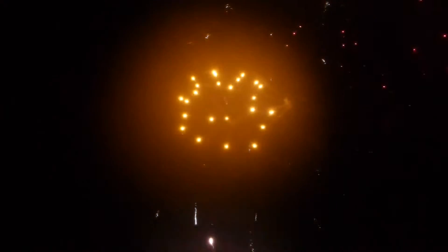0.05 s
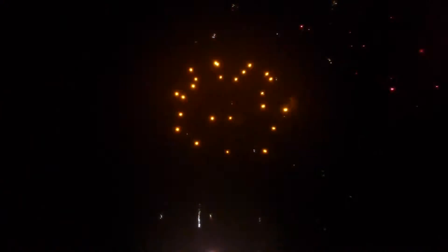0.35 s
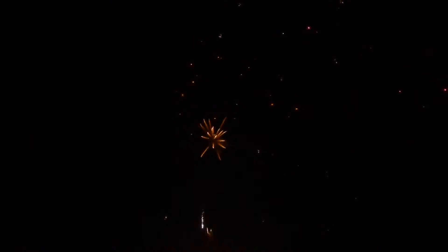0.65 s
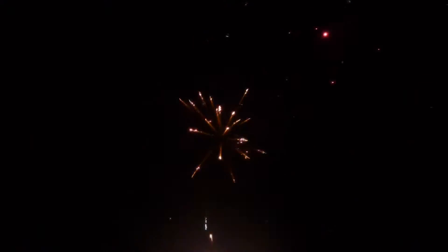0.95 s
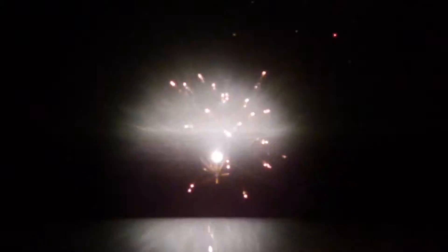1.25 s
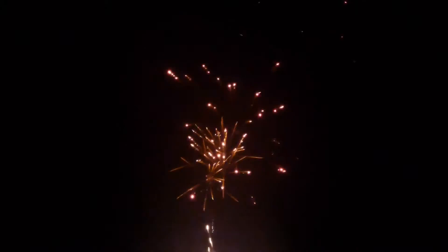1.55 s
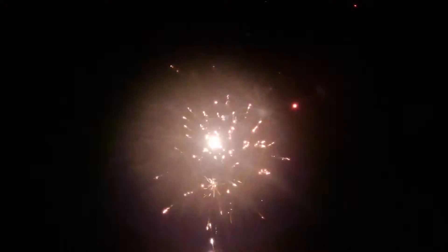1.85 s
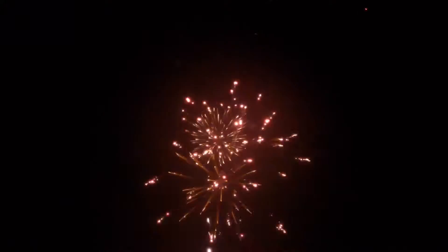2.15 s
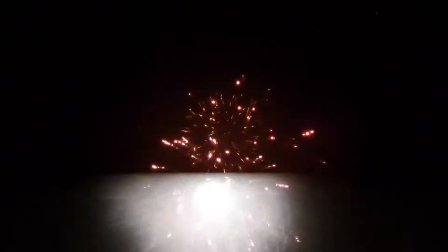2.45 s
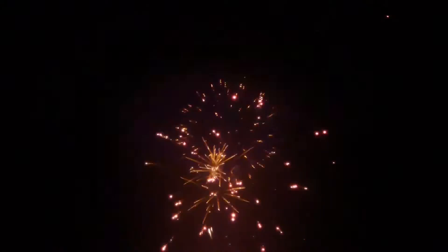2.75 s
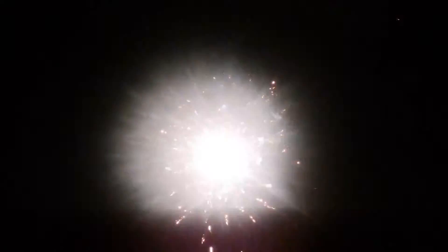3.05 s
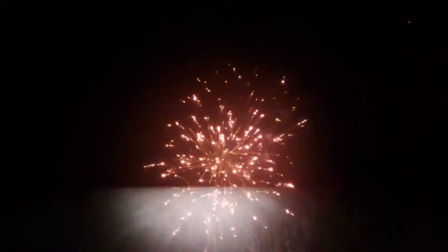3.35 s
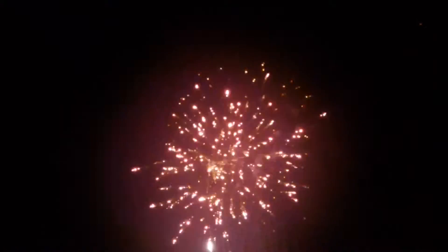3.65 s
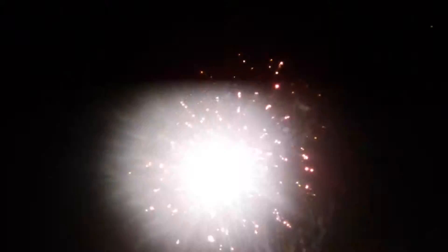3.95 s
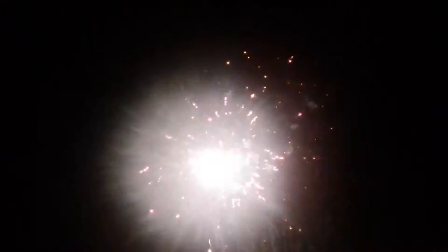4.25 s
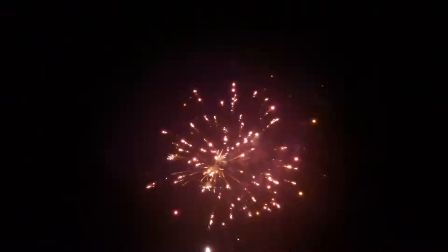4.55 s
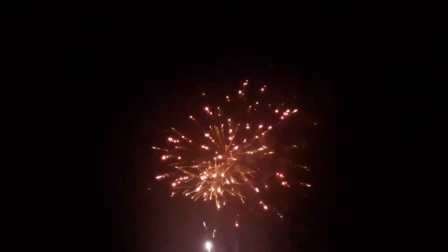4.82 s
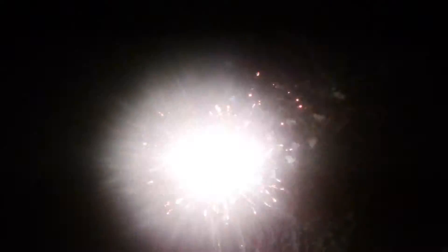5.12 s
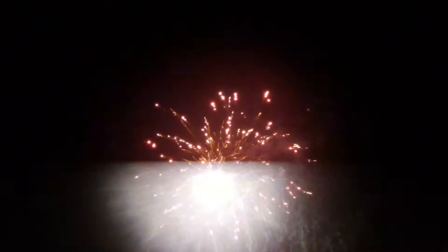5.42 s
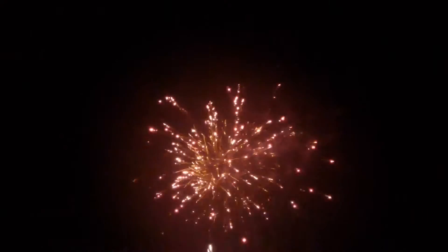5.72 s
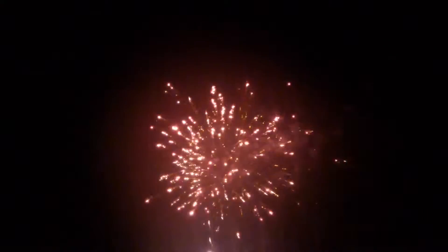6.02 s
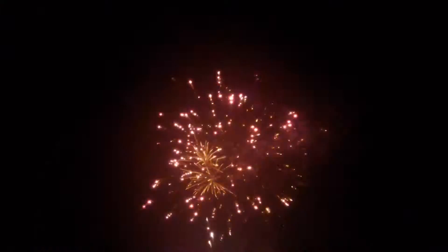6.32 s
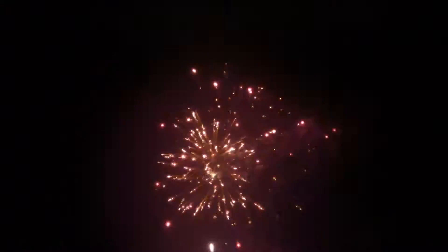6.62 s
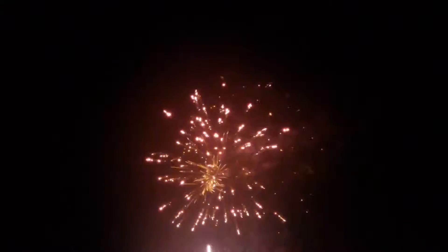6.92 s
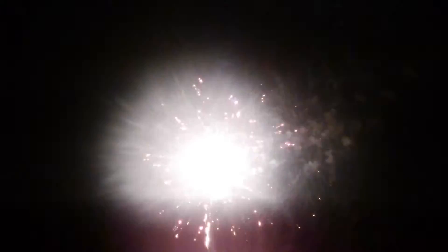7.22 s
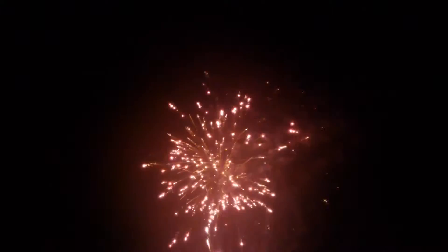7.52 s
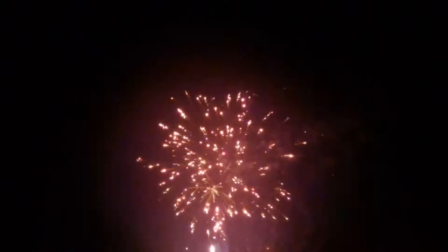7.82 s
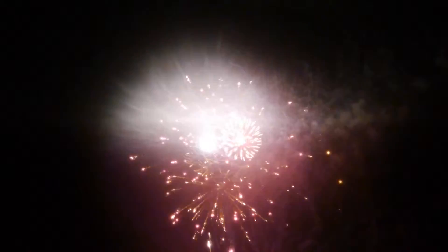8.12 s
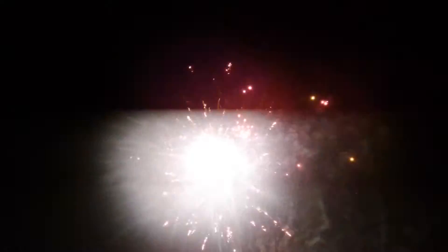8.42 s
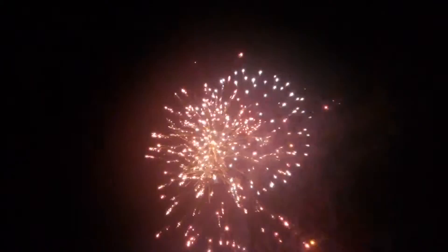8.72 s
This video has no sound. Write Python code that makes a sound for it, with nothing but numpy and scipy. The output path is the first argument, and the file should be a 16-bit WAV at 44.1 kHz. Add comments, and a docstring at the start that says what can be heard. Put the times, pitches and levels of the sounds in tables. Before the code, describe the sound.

Close under an outdoor fireworks display, shells explode with short, hard cracks, spaced at first, then in rapid clusters of two to four. Soft launch thumps and a few popping sparks fall between them, while fountains keep up a low flutter and a hiss toward the left. The bangs sit in the centre and leave grainy echoes. The phone microphone distorts a little, and the background dips after every blast.

```python
"""Close under a fireworks display: shells burst overhead, mortars thump, fountains roar and hiss, stars pop.
Each burst is a shock wave with a second shock and ground reflections, ringing in the phone's low cut.
Rough ground scatters it into a crack, and the surroundings return a fizz and a dull, grainy roll.
The bangs overload the microphone, and the gain control ducks the fountains after every one."""
import sys
import numpy as np
from scipy import signal
from scipy.fft import rfft, irfft
from scipy.io import wavfile
from scipy.ndimage import uniform_filter1d, minimum_filter1d

SR = 44100
rng = np.random.default_rng(int(sys.argv[2]) if len(sys.argv) > 2 else 0)


def persist_wave(psi):
    """Save psi, clipped to +-1, as 16-bit WAV."""
    counts = np.round(np.clip(psi, -1, 1) * 32767).astype(np.int16)
    wavfile.write(sys.argv[1], SR, np.atleast_2d(counts).T)


N = 386747

# Shell bursts. Each row: start in seconds, shock level in dB, pressure decay in ms, first reflection's
# lag in ms. That lag follows the shell's place in the sky and gives it its own hollow knock.
SHELLS = [(0.8767, 16.5, 3, 3.7), (1.4447, 16.5, 2.6, 3.2), (1.607, 15.5, 3, 3.5),
          (1.6406, 12.5, 0.79, 3.05), (2.1413, 15, 2.9, 2.9), (2.177, 13.5, 0.84, 2.93),
          (2.665, 14.5, 2.6, 4.1), (2.8325, 15, 4.5, 2.65), (2.8845, 13, 1.2, 3.1),
          (2.8893, 9.5, 0.59, 3.1), (3.0574, 15, 4, 3.15), (3.1693, 14, 3.1, 3.26), (3.2467, 14, 1.6, 3),
          (3.3234, 14, 0.75, 2.65), (3.3485, 12, 1, 3.25), (3.4178, 14.5, 0.47, 3.44),
          (3.741, 17, 0.79, 3.3), (3.9823, 15.5, 1.3, 3.3), (4.1988, 15.5, 3.7, 2.97),
          (4.3271, 15, 3.4, 3.2), (4.6227, 16, 1.7, 3.2), (4.8444, 15, 1.7, 3.26),
          (4.8614, 13.5, 0.67, 3.3), (4.8742, 11.5, .35, 2.8), (5.0272, 15, 1.1, 2.9),
          (5.2408, 15, 3.1, 3.27), (5.4703, 14.5, 1.7, 2.85), (5.4961, 13.5, .5, 3.4),
          (5.5376, 13, 0.51, 3.05), (5.7157, 14.5, 1.5, 3.15), (5.8002, 14, 1, 2.9),
          (5.8173, 10.5, 1.9, 3.4), (5.8469, 13.5, 0.28, 3.2), (6.482, 15, 1.1, 3.2),
          (6.4991, 13.5, 0.45, 3.04), (6.5255, 15, 0.22, 2.7), (6.5952, 14, 0.48, 3.5),
          (6.9498, 14.5, 2, 2.95), (7.1127, 15, 1, 2.85), (7.1535, 12.5, 0.85, 3.1), (7.159, 12, 0.31, 3.1),
          (7.424, 14.5, 0.87, 3.1), (7.4471, 12.5, 0.43, 3.2), (7.5625, 14, 0.9, 2.77),
          (7.5816, 11, 0.58, 3.2), (8.0006, 14, 2.3, 2.87), (8.1376, 14, 1.1, 2.7),
          (8.2776, 13.5, .65, 3.4), (8.3624, 13, 1.1, 3.25), (8.4769, 14.5, 0.47, 3.7),
          (8.5299, 11.5, .65, 3.15), (8.5766, 11.5, .55, 3.6), (8.5964, 14.5, 0.11, 3.2),
          (8.6162, 8.5, 0.49, 3), (8.7144, 17, 0.33, 3.86), (8.7395, 9.5, 0.38, 3.7)]
# Mortars firing. Each row: peak time in seconds, level in dB, pitch in Hz, half-length in ms.
MORTARS = [(.129, -10, 212, 3.4), (0.406, -18.5, 258, 3.9), (1.078, -20, 348, 4.3), (1.279, -22, 140, 7.7),
           (4.995, -5, 243, 4.1), (5.15, 1.5, 271, 4.6), (5.3605, 2, 290, 2.7), (5.923, -7.5, 272, 4.8),
           (6.735, -26, 86, 7.9), (7.968, -25.5, 90, 12)]
# Tone of the cracks and pops. Each row: frequency in Hz, relative level in dB.
CRACK_SPECTRUM = [(200, -16), (600, -0.5), (1000, 12.5), (1600, -2.5), (2000, 5.5), (3200, 2.5), (6000, -8),
                  (10000, -13.5), (16000, -37)]
# Tone of the sparks, gas and fizz. Each row: frequency in Hz, relative level in dB.
HISS_SPECTRUM = [(200, -21), (600, 5.5), (1080, 4), (1550, -1), (2400, -1.5), (4000, -2), (6300, -4),
                 (9000, -9), (12500, -18.5), (16000, -30)]


def undb(db):
    """Decibels to gain."""
    return 10 ** (np.asarray(db) / 20)


def samples(ms):
    """Milliseconds to whole samples."""
    return int(round(ms * SR / 1000))


def add(track, start_s, sound):
    """Mix a short sound into a track."""
    i = max(int(round(start_s * SR)), 0)
    part = sound[..., :max(N - i, 0)]
    track[..., i:i + part.shape[-1]] += part


def per_bin(points):
    """A curve over log frequency, read at every spectral bin."""
    hz, value = np.transpose(points)
    return np.interp(np.log(np.arange(N // 2 + 1) * SR / N + 1), np.log(hz), value)


def colour(x, spectrum):
    """Filter by a spectrum; white noise keeps its power."""
    gain = undb(per_bin(spectrum))
    return irfft(rfft(x) * gain / np.sqrt(np.mean(gain ** 2)), N)


def stereo_noise(correlation, balance_db):
    """Noise at two microphone ports; a positive balance leans left."""
    mid, side = rfft(rng.standard_normal((2, N)))
    alike = np.clip(correlation, -.99, .99)
    sign = np.array([[1], [-1]])
    ports = mid * np.sqrt(1 + alike) + sign * side * np.sqrt(1 - alike)
    return irfft(ports * undb(sign * balance_db / 2), N) / np.sqrt(2)


def wobble(rate_hz):
    """Random steps, smoothed twice."""
    hold = int(SR / rate_hz)
    steps = np.repeat(rng.standard_normal(N // hold + 1), hold)
    return uniform_filter1d(uniform_filter1d(steps, hold), hold)[:N]


def shell_bursts(second_ms=1.85, second_db=-17.5, first_echo_db=-9, lag_spread=.05, echo_spread_db=2):
    """Pressure jumps and sinks; a second shock follows, then reflections with blunted fronts."""
    # Weaker reflections off the ground and things nearby. Each row: lag in ms, gain in dB.
    reflections = [(6.0, -23), (6.7, -24), (8.7, -17), (26, -28.5)]
    pressure = np.zeros(N)
    ms = np.arange(samples(20)) / SR * 1000
    blunt = signal.butter(1, 6500, fs=SR)
    chance = rng.standard_normal((len(SHELLS), len(reflections) + 1, 2))
    for (start, db, decay_ms, echo_ms), draws in zip(SHELLS, chance):
        shock = undb(db) * np.exp(-ms / decay_ms)
        since_second = ms - second_ms * (1 + lag_spread * draws[0, 0])
        second_shock = undb(db + second_db) * (since_second > 0) * np.exp(-np.abs(since_second) / decay_ms)
        blast = shock + second_shock
        add(pressure, start, blast)
        reflected = signal.lfilter(*blunt, blast)
        add(pressure, start + samples(echo_ms) / SR, undb(first_echo_db) * reflected)
        for (lag_ms, gain_db), (shift, swing) in zip(reflections, draws[1:]):
            arrival = start + samples(lag_ms * (1 + lag_spread * shift)) / SR
            add(pressure, arrival, undb(gain_db + echo_spread_db * swing) * reflected)
    return microphone_ring(pressure)


def microphone_ring(pressure, turn_hz=1728, air_hz=12000, leak_db=-30, leak_hz=70):
    """A shock rings the microphone's low cut near 300 Hz, and the phone's case adds its resonances."""
    # Two resonant high-pass stages. Each row: corner in Hz, Q.
    low_cut = [(329, 1.91), (196.5, 1.94)]
    # Case resonances. Each row: centre in Hz, width in Hz, level in dB.
    case_modes = [(570, 110, -5.5), (960, 176, -0.5)]
    s = 1j * np.arange(N // 2 + 1) * SR / N
    response = np.prod([s ** 2 / (s ** 2 + s * hz / q + hz ** 2) for hz, q in low_cut], axis=0)
    response *= 1 + sum(undb(db) * s * width / (s ** 2 + s * width + hz ** 2)
                        for hz, width, db in case_modes)
    response *= (turn_hz - s) / (turn_hz + s)  # the treble flips polarity: a spike leads the swing
    response /= np.sqrt(1 + np.abs(s / air_hz) ** 4)  # air takes the very top
    bass_band = s * leak_hz / (s ** 2 + s * leak_hz + leak_hz ** 2)
    body_leak = undb(leak_db) * bass_band * s / (s + leak_hz)
    return irfft(rfft(pressure) * (response + body_leak), N)


def ground_crack(level_db=-9, growth=0.4, spread_db=1.06, decay_s=0.0042,
                 slap_db=-20, slap_s=0.02626, slap_smear_s=0.00058):
    """Rough ground scatters each shock into a spray of treble; something nearby slaps it back once."""
    t = np.arange(samples(50)) / SR
    slap = undb(slap_db) * np.exp(-((t - slap_s) / slap_smear_s) ** 2)
    spray = np.exp(-t / decay_s) + slap
    envelope = np.zeros(N)
    for (start, db, *_), swing in zip(SHELLS, rng.standard_normal(len(SHELLS))):
        add(envelope, start, undb(level_db + growth * db + spread_db * swing) * spray)
    return envelope * colour(stereo_noise(0.92, balance_db=0.17), CRACK_SPECTRUM)


def fizz_echo(level_db=-35, lag_s=0.099, lag_spread=0.036, smear_s=0.017, spread_db=1):
    """The surroundings scatter each crack back as a short fizz."""
    power = np.zeros(N)
    t = np.arange(SR // 2) / SR
    for (start, *_), (shift, swing) in zip(SHELLS, rng.standard_normal((len(SHELLS), 2))):
        puff = np.exp(-((t - lag_s * (1 + lag_spread * shift)) / smear_s) ** 2)
        add(power, start, undb(level_db + spread_db * swing) ** 2 * puff)
    return np.sqrt(power) * colour(stereo_noise(0.05, balance_db=5.8), HISS_SPECTRUM)


def far_echoes(level_db=-41.5, lag_spread=0.042, spread_db=1.4, flutter_db=2, grain_db=3.5):
    """The surroundings return every bang as a few smeared, grainy puffs and a dull roll."""
    # The returns. Each row: lag in seconds, smear in seconds, relative level in dB.
    echoes = [(0.073, 0.0055, 4.5), (0.099, 0.01, -1.5), (.14, 0.019, -0.5), (.2, 0.032, -4),
              (.35, 0.72, -12)]
    # Their dull tone. Each row: frequency in Hz, relative level in dB.
    echo_spectrum = [(40, -46), (80, -16), (140, -16), (260, -1), (360, 2.5), (520, -1.5), (760, -14.5),
                     (1050, -10), (1500, -17), (2200, -18), (4000, -22.5), (9000, -35), (16000, -59)]
    power = np.zeros(N)
    t = np.arange(SR) / SR
    chance = rng.standard_normal((len(SHELLS), len(echoes), 2))
    for (start, db, *_), draws in zip(SHELLS, chance):
        for (lag_s, smear_s, echo_db), (shift, swing) in zip(echoes, draws):
            puff = np.exp(-((t - lag_s * (1 + lag_spread * shift)) / smear_s) ** 2)
            add(power, start, undb(db + echo_db + spread_db * swing) ** 2 * puff)
    # single reflectors stand out of the roll as grains
    grains = stereo_noise(1.0, balance_db=3) * undb(grain_db * wobble(400))
    return undb(level_db + flutter_db * wobble(45)) * np.sqrt(power) * colour(grains, echo_spectrum)


def mortar_thumps():
    """Each lift charge is a soft thump of a few cycles."""
    thumps = np.zeros(N)
    t = np.arange(-samples(40), samples(40)) / SR
    for peak_s, db, hz, half_ms in MORTARS:
        envelope = np.exp(-(t * SR / samples(half_ms)) ** 2)
        add(thumps, peak_s + t[0], undb(db) * np.cos(2 * np.pi * hz * t) * envelope)
    return thumps


def mortar_gas(level_db=-26, growth=0.99, half_s=0.017):
    """Gas leaves each mortar in a spurt of hiss, louder for a stronger charge."""
    envelope = np.zeros(N)
    t = np.arange(-samples(60), samples(60)) / SR
    for peak_s, db, *_ in MORTARS:
        add(envelope, peak_s + t[0], undb(level_db + growth * db) * np.exp(-(t / half_s) ** 2))
    return envelope * colour(stereo_noise(.1, balance_db=7.7), HISS_SPECTRUM)


def fountains(roar_db=3.5, flutter_db=1.0, flicker_db=0.8):
    """Ground fountains: flames roar and flutter low down while jets of sparks hiss."""
    # The roar and hiss fade in as the gain recovers from an earlier bang, then burn on and slowly die down.
    # Each row: time in seconds, flame level in dB, spark level in dB.
    burn = [(0, -42, -46.5), (.17, -27.5, -33.5), (.6, -28.5, -31.5), (1.35, -30.5, -34), (1.7, -34, -37),
            (2.05, -30.5, -34), (2.35, -34, -34.5), (2.62, -26.5, -30), (2.95, -34.5, -34),
            (3.6, -28.5, -31), (4.1, -31.5, -32), (4.85, -31.5, -32.5), (5.4, -31, -31.5), (6, -28, -32),
            (6.35, -28.5, -32), (6.8, -33, -34.5), (7.8, -38.5, -37), (8.77, -36, -36.5)]
    # Tone of the flames. Each row: frequency in Hz, relative level in dB.
    roar_spectrum = [(20, -42), (40, -36), (80, -13.5), (150, -2), (260, 2), (450, -5.5), (700, -11.5),
                     (1100, -19.5), (2000, -28), (5000, -61)]
    # The hiss leans left. Each row: frequency in Hz, left minus right in dB.
    hiss_balance = [(400, 2), (800, 6), (1300, 12.5), (2400, 15), (4400, 8.5), (8000, 5.5), (15000, -1.5)]
    # Its treble spreads wide. Each row: frequency in Hz, left-right correlation from -1 to 1.
    hiss_correlation = [(600, 1), (1400, 0.52), (3100, -0.32), (7000, -0.4)]
    times, *levels = np.transpose(burn)
    flame_db, spark_db = (np.interp(np.arange(N) / SR, times, db) for db in levels)
    roar = colour(stereo_noise(0.72, balance_db=-2), roar_spectrum)
    roar *= undb(flame_db + roar_db + flutter_db * wobble(35))
    hiss = colour(stereo_noise(per_bin(hiss_correlation), per_bin(hiss_balance)), HISS_SPECTRUM)
    hiss *= undb(spark_db + flicker_db * wobble(24.82))
    return roar + hiss


def star_crackle(faint_count=120, faint_db=-17, tail_db=-16, tail_s=0.0022):
    """Burning stars pop: a few clear snaps and many faint ones, each with a tiny scattered tail."""
    # The clear snaps. Each row: start in seconds, level in dB.
    snaps = [(0.0712, 4), (0.124, -9), (1.3998, -3), (2.0834, -5), (7.962, -2)]
    clicks = np.zeros(N)
    when, size = rng.random((faint_count, 2)).T
    for start, db in snaps:
        add(clicks, start, undb([db]))
    np.add.at(clicks, (when * N).astype(int), undb(faint_db) * size ** 2)
    t = np.arange(samples(12)) / SR
    tails = undb(tail_db) * np.exp(-t / tail_s) * rng.standard_normal((2, len(t)))
    tails[:, 0] = 1  # the direct click
    return colour(signal.fftconvolve(clicks[None], tails, axes=1)[:, :N], CRACK_SPECTRUM)


def from_ahead(x, lag_s=7e-6, balance_db=-0.14):
    """Sound from almost straight ahead: a hair sooner on the left, a hair louder on the right."""
    hz = np.arange(N // 2 + 1) * SR / N
    sign = np.array([[1], [-1]])
    return irfft(rfft(x) * np.exp(1j * np.pi * sign * hz * lag_s), N) * undb(sign * balance_db / 2)


def scene():
    """Bursts and thumps sit in the centre; hiss and fizz spread wide around them."""
    bangs = from_ahead(shell_bursts() + mortar_thumps()) + ground_crack()
    return bangs + fizz_echo() + far_echoes() + mortar_gas() + fountains() + star_crackle()


def gain_control(x, threshold_db=-3, depth_db=13, hold_ms=120, release_db_per_s=115,
                 memory_s=2.68, memory_weight=1.57):
    """Loud peaks duck the gain by a limited depth; it holds, then recovers, less fully after many bangs."""
    hold = samples(hold_ms)
    origin = (hold - 1) // 2 - samples(1)  # looks 1 ms ahead
    peak = -minimum_filter1d(-np.abs(x).max(axis=0), hold, origin=origin, mode="constant")
    cut_db = np.clip(20 * np.log10(peak + 1e-9) - threshold_db, 0, depth_db)
    release_db = release_db_per_s * np.arange(N) / SR
    cut_db = np.maximum.accumulate(cut_db + release_db) - release_db
    k = 1 / (memory_s * SR)
    lingering_db = np.minimum(memory_weight * signal.lfilter([k], [1, k - 1], cut_db), depth_db)
    return x * undb(-np.maximum(cut_db, lingering_db))


def record(dry, lopsided=0.005, top_hz=16000):
    """The phone ducks, rounds off the remaining peaks, negative ones a little sooner, and cuts the top."""
    ducked = gain_control(dry)
    ceiling = 1.1 + lopsided * np.sign(ducked)
    rounded = ducked / np.cbrt(1 + np.abs(ducked / ceiling) ** 3)
    return signal.sosfilt(signal.ellip(8, .2, 70, top_hz, fs=SR, output="sos"), rounded)


dry = scene()
out = record(dry)
persist_wave(out)
```